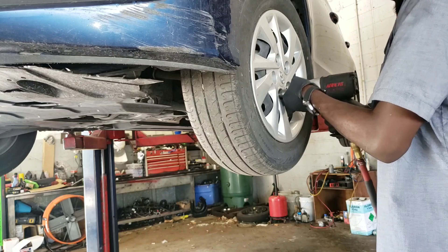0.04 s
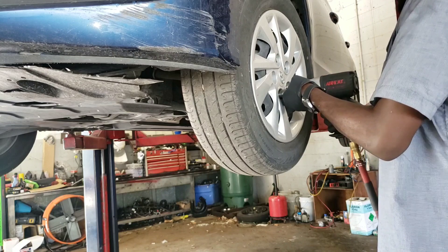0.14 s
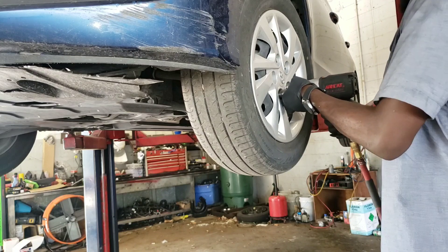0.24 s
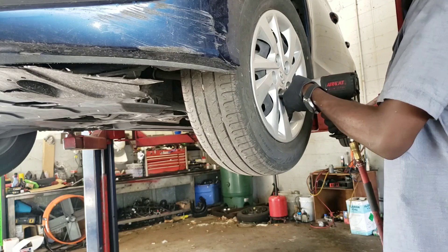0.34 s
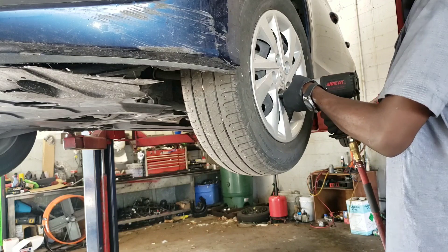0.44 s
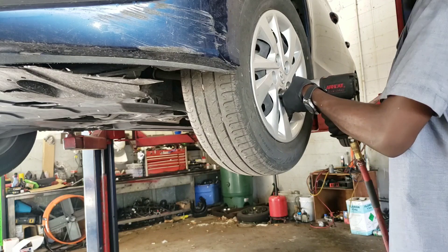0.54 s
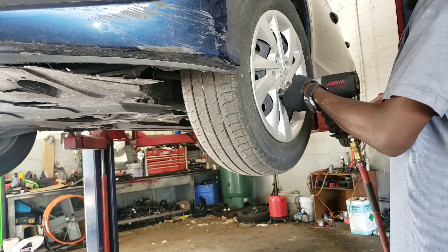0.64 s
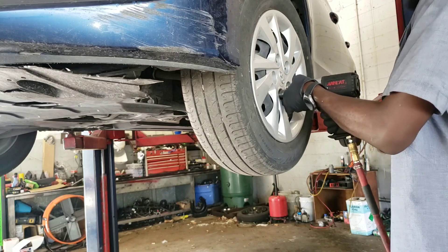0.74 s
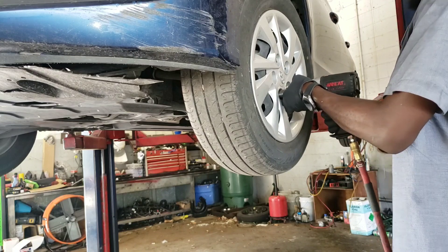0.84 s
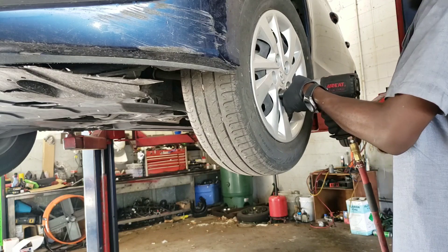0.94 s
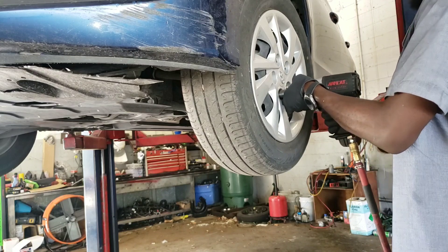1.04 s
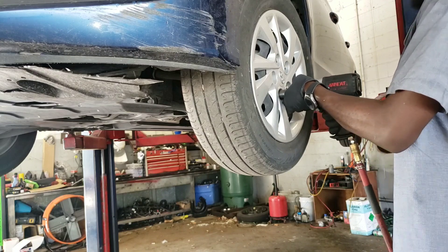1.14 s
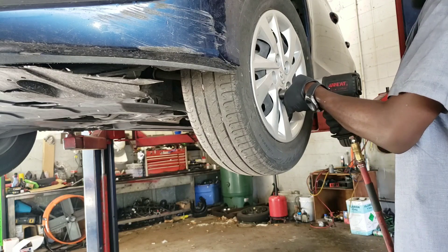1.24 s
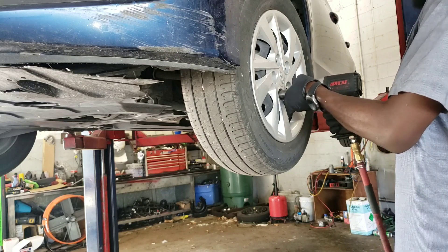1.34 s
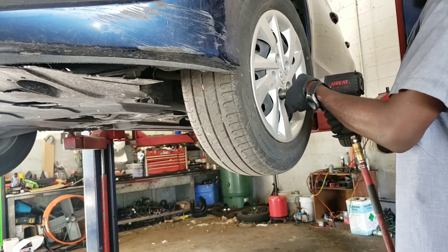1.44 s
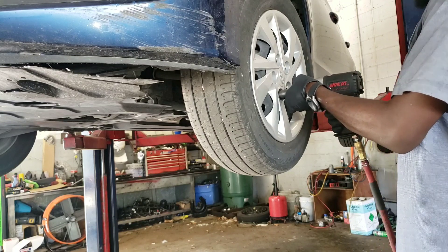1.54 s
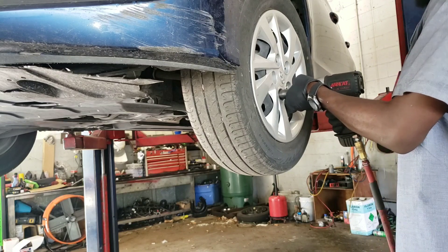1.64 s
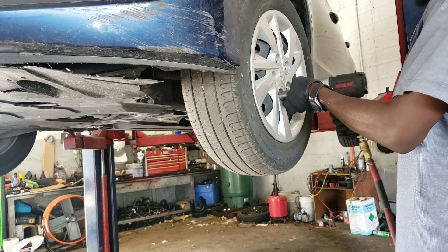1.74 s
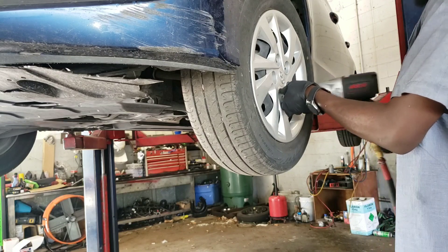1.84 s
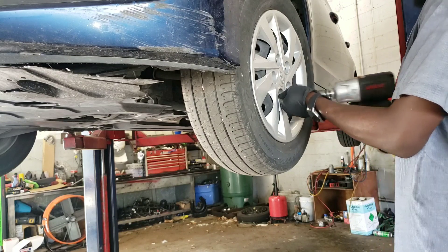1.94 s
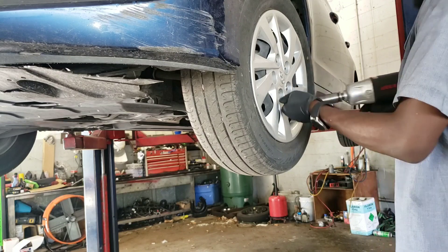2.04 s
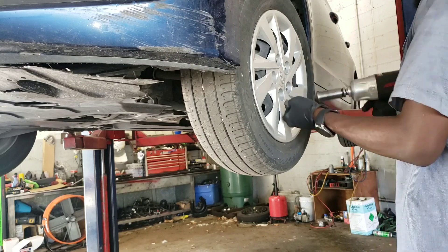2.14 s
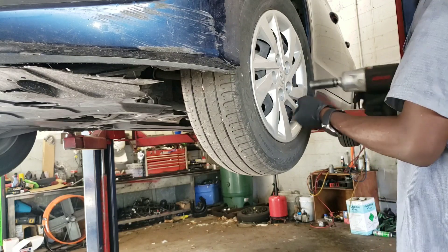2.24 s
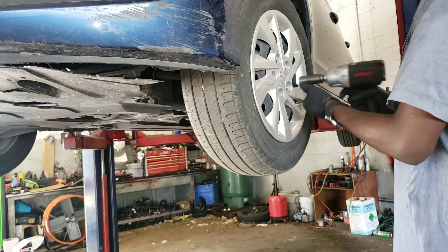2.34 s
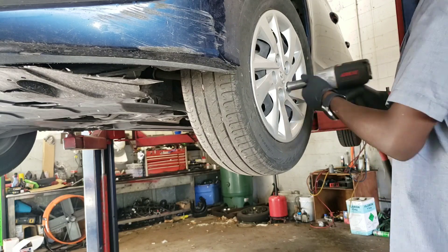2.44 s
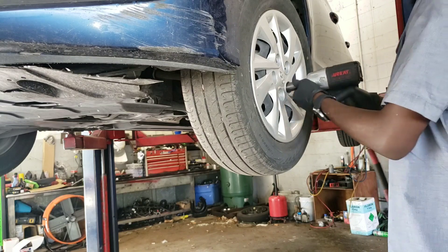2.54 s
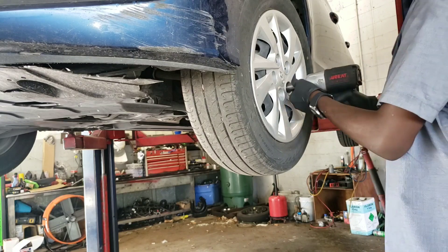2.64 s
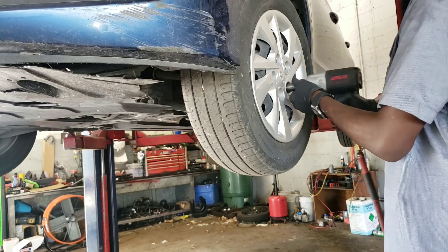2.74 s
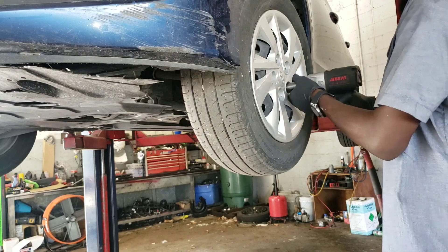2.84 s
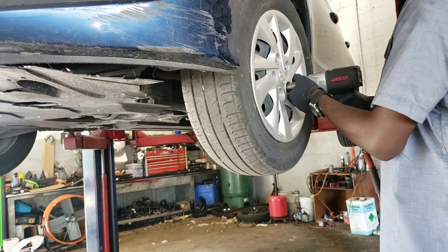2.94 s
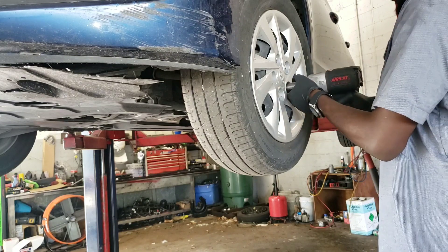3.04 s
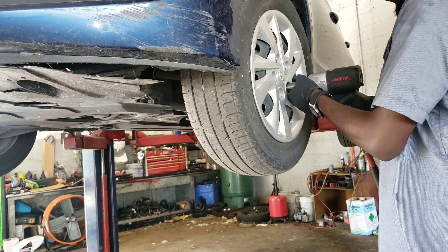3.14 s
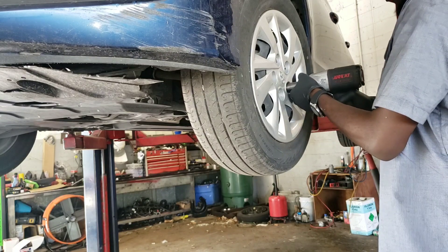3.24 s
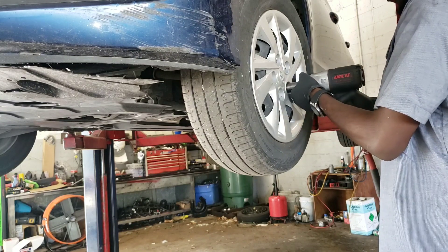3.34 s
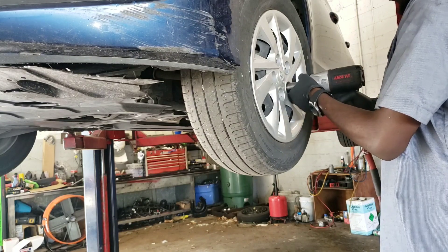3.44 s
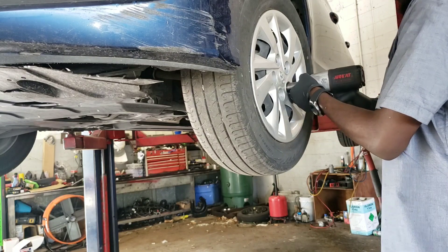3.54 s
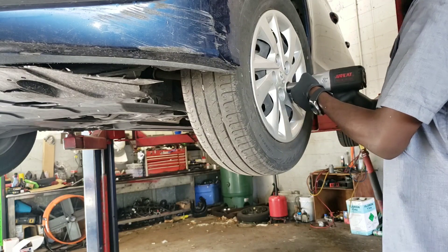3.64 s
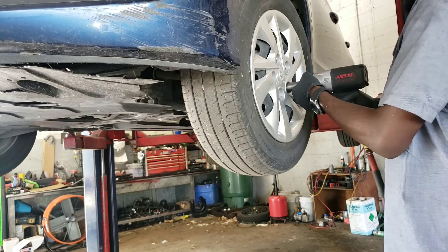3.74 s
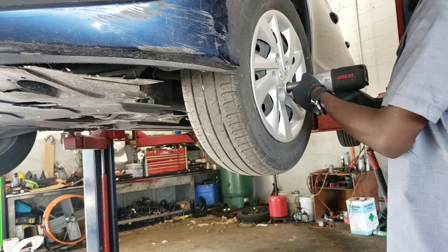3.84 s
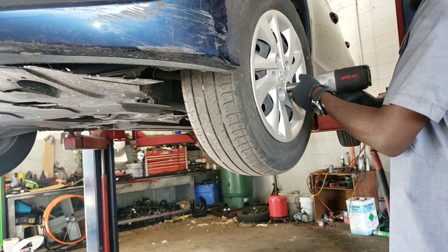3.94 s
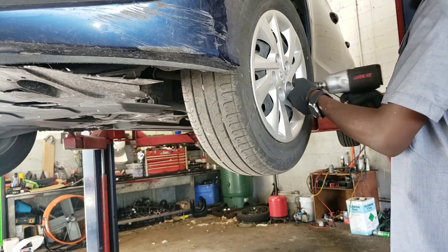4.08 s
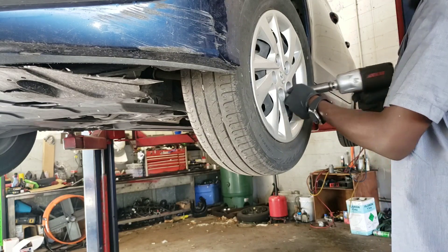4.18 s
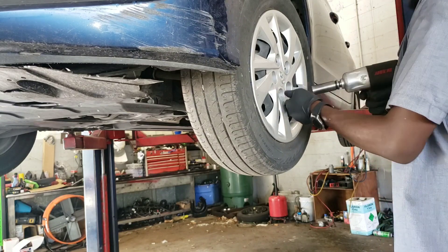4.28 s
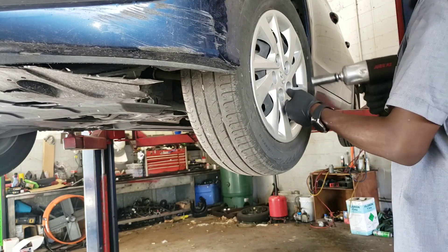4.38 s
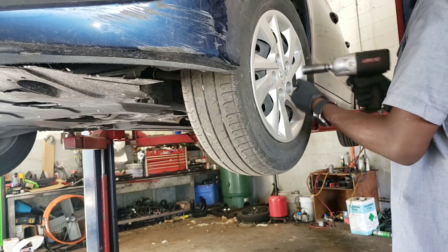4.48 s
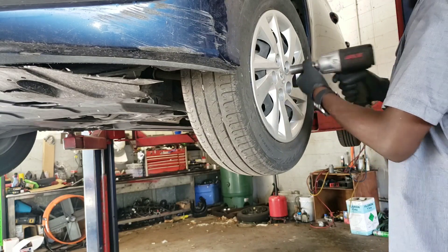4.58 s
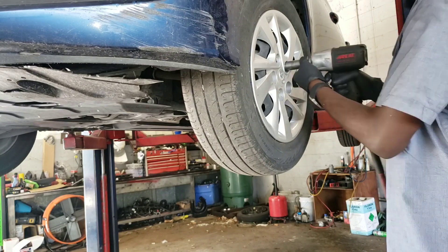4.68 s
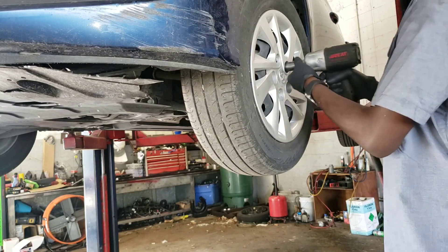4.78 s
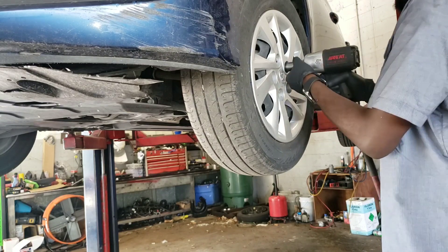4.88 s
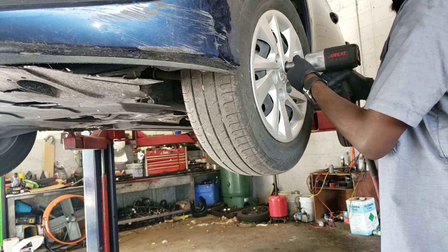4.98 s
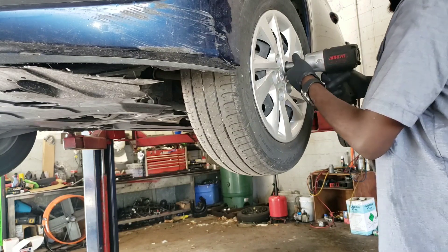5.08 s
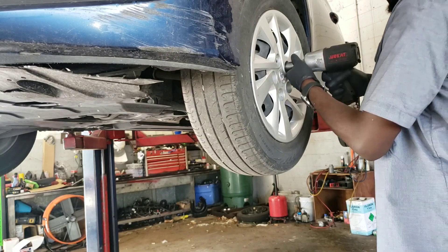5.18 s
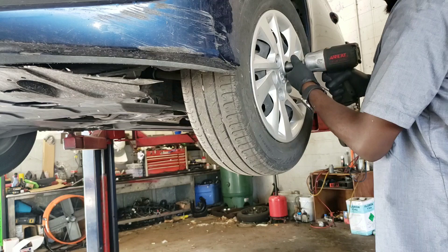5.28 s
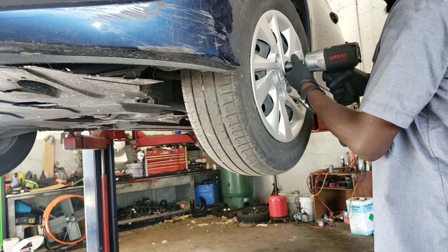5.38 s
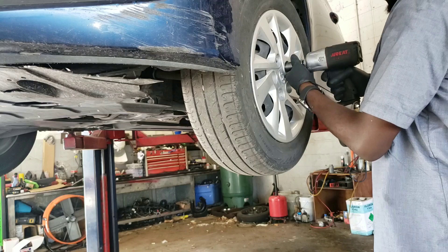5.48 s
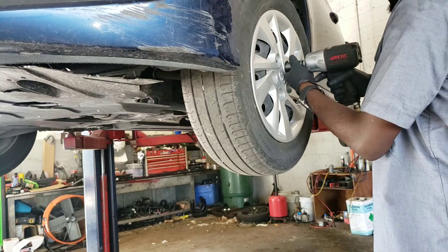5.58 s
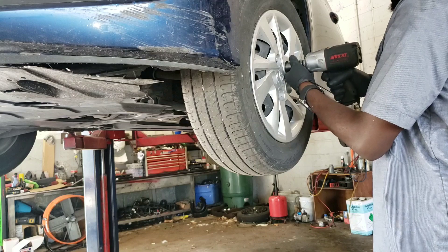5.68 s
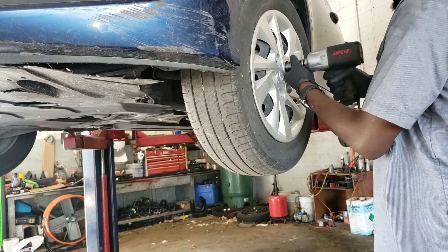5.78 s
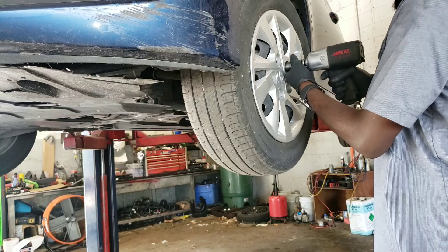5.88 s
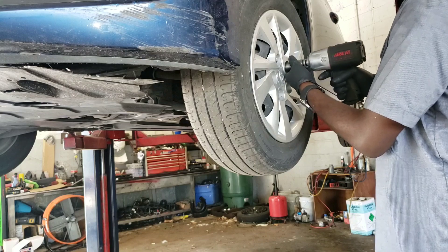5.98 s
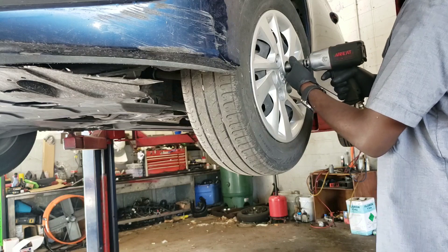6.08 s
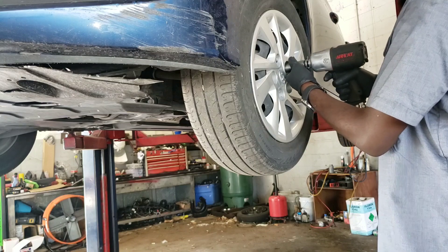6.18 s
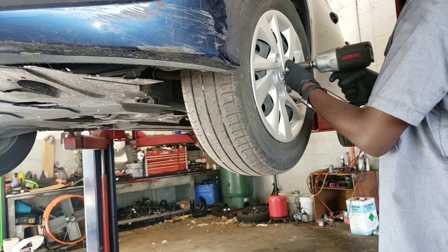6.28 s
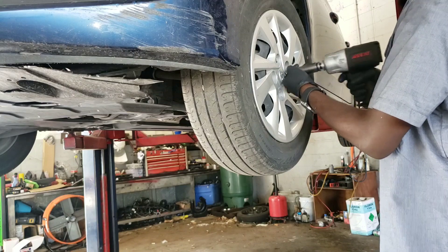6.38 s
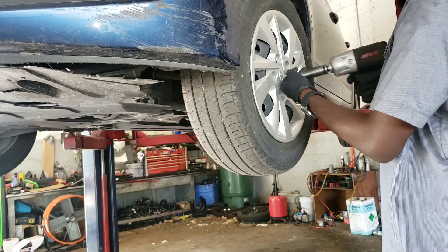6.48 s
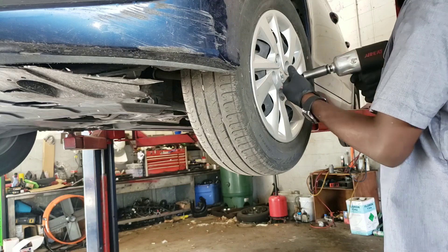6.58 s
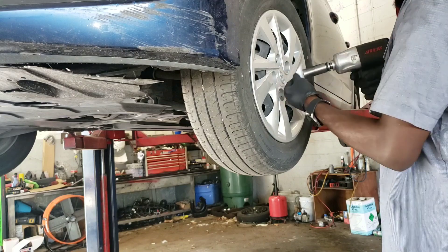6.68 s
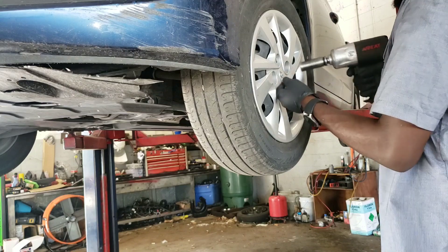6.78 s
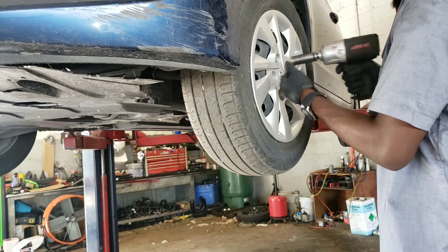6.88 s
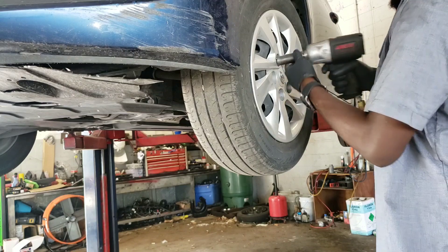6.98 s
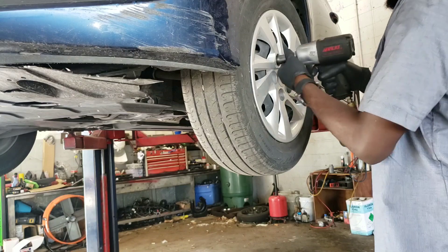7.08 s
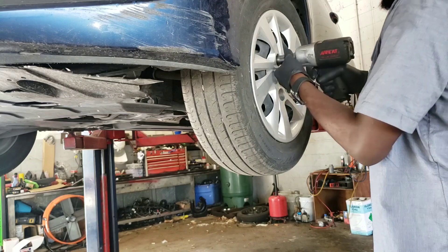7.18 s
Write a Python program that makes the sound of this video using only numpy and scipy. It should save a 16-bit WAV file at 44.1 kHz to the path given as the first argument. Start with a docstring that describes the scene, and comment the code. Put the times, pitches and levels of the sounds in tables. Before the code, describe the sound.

Close stereo pickup of a pneumatic wrench on a car's wheel nuts: rapid, uneven metal hammering, sharp treble snaps and rushing exhaust. Clustered pulls open the scene, then the freed motor sings up and winds down. Two more hammering groups come later, separated by hollow knocks, clicks and high socket jingles. A faint far whine lies behind; near the end another machine rises in the reverberant shop.

```python
"""An air impact wrench works on lug nuts in a repair shop: noise bursts and ringing metal make the hammer blows.
Exhaust air, shaped noise, hisses and rattles around them; a valve pop opens every pull but the first.
Then the vane motor, a stack of harmonics, runs free and winds down while the socket clinks and knocks.
A far machine whines, another starts up late, and the hall answers with fading noise echoes.
The right microphone port hears everything a little louder and earlier."""
import sys
import numpy as np
from scipy import signal
from scipy.fft import rfft, irfft, next_fast_len
from scipy.io import wavfile
from scipy.ndimage import map_coordinates

SR = 44100
rng = np.random.default_rng(int(sys.argv[2]) if len(sys.argv) > 2 else 0)


def store_pcm(level_fs):
    """Save levels as 16-bit WAV."""
    pcm = np.round(np.clip(level_fs, -1, 1) * 32767).astype(np.int16)
    wavfile.write(sys.argv[1], SR, np.atleast_2d(pcm).T)


def nominal_scale(level):
    """Amplitude ratio for a level in decibels (scalar or array-like)."""
    x = np.asarray(level, float) / 20
    return 10 ** x


N = 318402  # samples

# trigger pulls: (open [s], close [s], air level at open [dB], air level at close [dB], fade by 60 dB [s])
TRIGGER_PULLS = [(0, 0.05, -17.5, -33.5, 0.29), (0.135, 0.258, -24.5, -21.5, 0.29),
                 (0.394, 0.575, -22.5, -30.5, 0.44), (0.672, 0.913, -24.5, -25.5, 0.43),
                 (1.096, 1.242, -21.5, -28, 0.48), (1.436, 1.517, -24, -28.5, 1),
                 (2.829, 3.466, -20.5, -29, 0.39), (3.688, 3.814, -23.5, -30.5, 0.75),
                 (5.032, 5.598, -17.5, -28, 0.23), (5.83, 5.97, -22.5, -30, 0.54)]
# hammer blows that land hard: (time [s], relative clack level [dB], relative treble level [dB])
BLOWS = [(0.0032, -24.5, -24.5), (0.0392, -21.5, -28), (0.1692, -24, -12), (0.2024, -17.5, -11.5),
         (0.2187, -16.5, -15), (0.2506, -19, -16.0), (0.27, -13.5, -17), (0.4078, -24, -19),
         (0.4228, -12.5, -11), (0.4406, -18, -32), (0.4712, -17, -12.5), (0.5051, -17.5, -16),
         (0.5252, -14, -11), (0.6154, -21.5, -23), (0.6878, -14, -18), (0.7066, -20, -13),
         (0.74, -15.5, -14), (0.7567, -16.5, -12), (0.7921, -19.5, -11), (0.8416, -20.0, -11),
         (0.8668, -15.5, -10), (0.8869, -15, -22), (0.9172, -15, -9), (1.1243, -14, -13),
         (1.1667, -15, -6.5), (1.1977, -23, -12), (1.228, -18, -12), (1.453, -18, -14), (1.4724, -14, -8.5),
         (1.498, -15, -10), (1.5096, -21, -11.5), (1.5224, -23.0, -18), (1.5362, -18.5, -16),
         (2.8481, -16, -7.5), (2.8683, -17.5, -10), (2.905, -18, -11), (2.9431, -23, -13),
         (2.966, -15, -10), (2.9832, -12.5, -12.0), (3.024, -19, -20), (3.0654, -18.5, -14),
         (3.1054, -14.5, -12), (3.1298, -19, -12), (3.15, -16.5, -15), (3.1744, -19, -12),
         (3.192, -13, -11.5), (3.2292, -19.5, -10.5), (3.2614, -23, -12), (3.28, -16.5, -14),
         (3.296, -15, -11.5), (3.337, -16.5, -22.0), (3.3564, -18, -9), (3.389, -19, -10.0),
         (3.4024, -21, -13), (3.4163, -17.5, -11), (3.452, -37, -11), (3.4748, -21, -12), (3.507, -19, -13),
         (3.7074, -20.5, -16), (3.7271, -13.5, -9.5), (3.761, -28, -11), (3.782, -20.5, -11),
         (5.064, -19.5, -14.5), (5.081, -32, -19), (5.0997, -17, -19), (5.139, -17, -12), (5.177, -21, -16),
         (5.2165, -13, -12), (5.2386, -18, -25), (5.2576, -15, -11), (5.2788, -21.5, -14),
         (5.298, -24, -17), (5.3433, -17.5, -13), (5.39, -18.5, -12), (5.4124, -18.5, -5.5),
         (5.4295, -17.5, -12), (5.449, -15.5, -8.5), (5.4626, -23, -11), (5.4843, -15, -10),
         (5.4982, -21, -11.5), (5.5156, -16, -12), (5.532, -16, -9), (5.563, -23, -12),
         (5.5803, -18, -12.5), (5.6339, -20.5, -28), (5.8472, -19.5, -13.5), (5.8669, -20, -5.5),
         (5.897, -20, -6), (5.9224, -15, -10), (5.9352, -22, -8), (5.989, -19, -7.5)]
# ringing of the steel wheel: (frequency [Hz], relative level [dB], free fade by 60 dB [s])
WHEEL_MODES = [(130, -24.5, 0.66), (225, -11.5, 0.045), (364, -17.5, 0.095), (443, -9, 0.033),
               (598, -4.5, 0.054), (819, -12, 0.12), (1064, -7.5, 0.052), (1193, -3, 0.053),
               (1700, -8.5, 0.072), (1920, -11, 0.074), (2150, -29, 0.035)]
# ringing of the anvil that the hammer hits: (frequency [Hz], relative level [dB], free fade by 60 dB [s])
ANVIL_MODES = [(3028, 0.5, .05), (3564, 2, 0.07), (5500, 4, 0.041), (6250, 4.5, 0.034),
               (10500, -2.5, 0.018), (10800, -7.5, 0.028), (14000, 9, .03)]
# colour of the rushing air: (frequency [Hz], relative level per Hz [dB])
HISS_COLOUR = [(710, -33), (1200, -0.5), (1530, 2), (1880, 6.5), (2340, 2.5), (3620, 6), (4000, 2.5),
               (5740, 0.5), (8410, -6.5), (10800, 4), (14100, -1.5), (15700, 0), (16400, -33)]
# colour of a metal clack: (frequency [Hz], relative level per Hz [dB])
CLACK_COLOUR = [(1000, -31), (2000, 1), (3500, -1.5), (6000, 2.5), (7500, -4), (9000, -13.5)]
# colour of the sharp treble in a contact: (frequency [Hz], relative level per Hz [dB])
SPIT_COLOUR = [(7500, -17), (9000, 0.5), (10500, 6), (13000, 3.5), (15300, 3.5), (16500, -3.5)]
# colour of a dull, hollow knock: (frequency [Hz], relative level per Hz [dB])
KNOCK_COLOUR = [(90, -5), (200, 0.5), (450, 9.5), (1000, 6), (2000, 6.5), (3500, -39)]
# how alike the two ports hear noise: (frequency [Hz], left-right likeness [-1 to 1])
PORT_LIKENESS = [(40, 0.77), (80, 1), (150, 0.9), (400, 0.87), (800, 0.11), (1500, 0.045), (4000, 0.086),
                 (15000, 0.047)]


def unit(x):
    """Scaled to an rms of 1."""
    return x / np.sqrt(np.mean(x ** 2) + 1e-20)


def along(points, hz):
    """Reads (Hz, value) points at any frequency, on a log axis."""
    point_hz, value = np.transpose(points)
    return np.interp(np.log(hz + 1), np.log(point_hz + 1), value)


def curves(rows):
    """One value per sample for each column after the time."""
    s, *columns = np.transpose(rows)
    return [np.interp(np.arange(N) / SR, s, column) for column in columns]


def wobble(rate):
    """A smooth random curve with rate knots a second."""
    knots = rng.standard_normal(int(N * rate / SR) + 4)
    return map_coordinates(knots, [np.arange(N) * rate / SR])


def filtered(x, response):
    """Sound x shaped by a (complex) response to each frequency."""
    m = next_fast_len(N + 8192)
    return irfft(rfft(x, m) * response(np.fft.rfftfreq(m, 1 / SR)), m)[..., :N]


def rush(colour):
    """Steady stereo noise of rms 1, partly alike in both ports."""
    def response(hz):
        turn = np.arccos(np.clip(along(PORT_LIKENESS, hz), -1, 1)) / 2
        return nominal_scale(along(colour, hz)) * [np.cos(turn), np.sin(turn)]
    mid, side = filtered(rng.standard_normal((2, N)), response)
    return unit(np.array([mid + side, mid - side]))


def train(times, db):
    """One impulse per contact."""
    return np.bincount(np.round(times * SR).astype(int), nominal_scale(db), N)[:N]


def dying(x, t60, rise):
    """Each impulse becomes a quick swell (rise, s) and an exponential fade (60 dB in t60 s)."""
    soft = np.exp(-1 / (rise * SR))
    fade = nominal_scale(-60 / (t60 * SR))
    return signal.lfilter([1 - soft], np.convolve([1, -fade], [1, -soft]), x)


def ringing(modes, times, db, near_hz=None, swing_db=2):
    """Every contact rings the modes at new strengths, a little differently at each port."""
    scatter_db = rng.standard_normal((len(db), len(modes), 3)) * [swing_db, 1.5, 1.5]
    out = np.zeros((2, N))
    for k, (hz, level_db, t60) in enumerate(modes):
        r, w = nominal_scale(-60 / (t60 * SR)), 2 * np.pi * hz / SR
        if near_hz is not None:  # modes ring less the more octaves they lie from this pitch
            level_db = -14 * abs(np.log2(hz / near_hz))
        both_db = db + level_db + scatter_db[:, k, 0]
        hits = [train(times, both_db + scatter_db[:, k, side]) for side in (1, 2)]
        out += signal.lfilter([np.sin(w)], [1, -2 * r * np.cos(w), r * r], hits)
    return out


def stack(hz, orders, jitter, waver_db, tilt_db=0):
    """Sines at multiples of a slightly unsteady rate; tilt_db is added once per multiple."""
    phase = 2 * np.pi * np.cumsum(hz * (1 + jitter * wobble(60))) / SR
    out = 0
    for k, db in orders:
        level = nominal_scale(db + k * tilt_db + waver_db * wobble(30))
        out = out + level * np.sin(k * phase + rng.uniform(0, 2 * np.pi))
    return out


def hall_noise():
    """The steady murmur of the hall: coloured noise with a slight drift in level."""
    # (frequency [Hz], relative level per Hz [dB])
    colour = [(15, -51), (28, -46.5), (54, -3.5), (97, -14), (128, -12), (377, -24), (444, -29),
              (685, -30.5), (806, -34), (924, -30.5), (1920, -32.5), (2080, -33.5), (6340, -35.5),
              (7270, -42.5), (15100, -35), (16400, -55.5)]
    return nominal_scale(-52 + 0.8 * wobble(5)) * rush(colour)


def far_whine():
    """A far machine whines: a few multiples of a slowly moving pitch."""
    # path of the whine: (time [s], pitch [Hz], level [dB])
    path = [(0, 385, -77.5), (2.26, 387, -62), (2.6, 349, -70), (3.5, 390, -75), (4.1, 392, -59),
            (5.0, 393, -59), (6.9, 392.7, -73), (7.05, 369, -64), (7.22, 365, -64)]
    # its multiples: (multiple of the pitch, relative level [dB])
    multiples = [(1, -7.5), (2, -5.5), (3, -17.5)]
    hz, db = curves(path)
    return nominal_scale(db) * stack(hz, multiples, jitter=0.00055, waver_db=3)


def late_machine():
    """A machine starts late: noise and a low hum come up; a straining tone and a rasp swell, then weaken."""
    # colour of its noise: (frequency [Hz], relative level per Hz [dB])
    colour = [(53, -41), (90, -23), (128, 4), (225, -7), (404, -7.5), (1050, -20), (12900, -22.5),
              (15400, -28), (16400, -55.5)]
    # its loudness: (time [s], level [dB])
    loudness = [(5.85, -85), (6.0, -53.5), (6.2, -47.5), (6.45, -49), (6.7, -50.5), (7.22, -46.5)]
    # its strain: (time [s], tone [Hz], tone over its noise [dB], rasp over its noise [dB])
    strain = [(6.0, 385, -25, -7), (6.12, 392, 2.5, -11), (6.3, 398, 4, -2), (6.45, 404, 6, -3.5),
              (6.55, 404.4, 2, -17), (6.7, 402, -5, -17), (7.22, 390.5, -8, -11)]
    tone_hz, tone_db, rasp_db = curves(strain)
    partials = [(0.885, -3), (1, 0), (2, -14)]  # (multiple, dB)
    sides = [stack(tone_hz, partials, jitter=0.012, waver_db=3) for side in range(2)]
    tone = nominal_scale(tone_db) * np.array(sides)
    rasp_colour = [(500, -38), (900, -3), (1700, -1.5), (2800, -17)]  # (Hz, dB per Hz)
    rasp = nominal_scale(rasp_db + 3 * wobble(25)) * rush(rasp_colour)
    hum = stack(np.full(N, 119.56), [(1, -11)], jitter=0.0037, waver_db=3.5)
    return nominal_scale(curves(loudness)[0]) * (rush(colour) + tone + rasp + hum)


def shop():
    """The background: hall noise, the far whine and the late machine."""
    return hall_noise() + far_whine() + late_machine()


def hall(x):
    """Echoes as fading noise, each pitch at its own speed, with a new random pattern every quarter second."""
    # (frequency [Hz], fade by 60 dB [s])
    fade = [(150, 0.64), (700, 0.42), (5000, 0.4), (13000, 0.32)]
    out, step = np.zeros((2, N + SR)), SR // 4
    for start in range(0, N, step):
        hz, t, z = signal.stft(rng.standard_normal((2, SR // 2)), SR, nperseg=256)
        alike = np.clip(along(PORT_LIKENESS, hz), 0, 1)[:, None]  # long waves reach both ports alike
        z[1] = alike * z[0] + np.sqrt(1 - alike ** 2) * z[1]
        tail = signal.istft(z * nominal_scale(-60 * t / along(fade, hz)[:, None]), SR, nperseg=256)[1]
        wet = signal.fftconvolve(x[:, start:start + step], tail / np.linalg.norm(tail[0]), axes=1)
        out[:, start:start + wet.shape[1]] += wet
    return out[:, :N]


def handling():
    """The socket is set against nuts and wheel: short clacks, hollow knocks, scrapes and damped ringing."""
    # contacts: (time [s], relative clack, treble and knock levels [dB], pitch that rings most [Hz])
    contacts = [(2.319, -47, -62, -53, 3000), (2.5375, -37.5, -43, -46, 2630), (2.548, -46, -58, -63, 1700),
                (2.616, -43, -49, -50, 3000), (2.6279, -30, -27, -35.5, 3060),
                (2.644, -37, -44, -37.5, 3030), (2.663, -38, -31, -28.5, 130), (2.729, -35, -34, -38, 3630),
                (2.822, -42, -49, -46, 3000), (4.1175, -40.5, -41, -33, 600), (4.284, -49, -65, -58, 1190),
                (4.7413, -42, -55, -28.5, 1100), (4.7465, -33, -34, -21, 1700),
                (4.7778, -52, -54, -28, 1100), (4.815, -43, -56, -51, 1700), (4.842, -31, -32, -36, 5570),
                (4.849, -29, -47, -32, 5570), (4.903, -29.5, -31.5, -63, 3600),
                (4.9141, -34, -34, -33, 1140), (6.666, -49, -37, -57, 2980), (6.7697, -46, -39, -45, 2986),
                (6.947, -48, -43, -62, 2965), (7.145, -26, -26, -44, 3060), (7.1764, -29, -30, -25.5, 351)]
    # scrapes over a nut: (start [s], loudest [s], end [s], level [dB]); an end before the start is silent
    scrapes = [(2.628, 2.67, 2.7, -50), (4.838, 4.85, 4.65, -41.5), (7.117, 7.131, 7.165, -34)]
    s, clack_db, treble_db, knock_db, near_hz = np.transpose(contacts)
    t = np.arange(N) / SR
    clack = dying(train(s, clack_db - 2), t60=0.049, rise=0.00037)
    scrape = sum(nominal_scale(db) * np.interp(t, [a, top, b], [0, 1, 0]) for a, top, b, db in scrapes)
    scrape = scrape * nominal_scale(3 * wobble(370))
    spit = dying(train(s, treble_db - 3), t60=0.033, rise=0.0006) * rush(SPIT_COLOUR)
    knock = dying(train(s, knock_db - 1), t60=0.022, rise=0.00065) * rush(KNOCK_COLOUR)
    # a hand on the socket shortens the ringing
    held = [(hz, db, 0.7 * t60) for hz, db, t60 in WHEEL_MODES + ANVIL_MODES]
    ring = ringing(held, s, clack_db - 4.5, near_hz)
    wheel = ringing(WHEEL_MODES, s, knock_db - 14)
    return (clack + scrape) * rush(CLACK_COLOUR) + spit + knock + wheel + ring


def clinks():
    """The loose socket rings very high when it clinks, and rattles damped on its shaft in between."""
    # clear clinks: (time [s], relative tick level [dB], relative ring level [dB])
    clear = [(1.614, -32, -20), (1.6673, -27, -31), (1.7522, -18, -36), (1.8209, -27, -29),
             (1.8725, -41, -26), (1.904, -41, -31), (1.985, -24, -25), (2.627, -30, -31), (3.87, -12, -26),
             (3.926, -15.5, -26.5), (4.006, -34, -25.5), (4.049, -21, -31), (4.089, -19, -21),
             (4.121, -28, -28), (4.2598, -28.5, -29.5), (6.059, -17, -32), (6.1457, -22, -26),
             (6.289, -27, -33), (6.338, -27, -25), (6.5833, -26.5, -39), (6.604, -38, -39),
             (7.118, -16.5, -31)]
    # faint jingling while the shaft coasts: (start [s], end [s], ticks per second, relative level [dB])
    jingle = [(1.596, 1.954, 70, -42), (1.964, 2.341, 20, -48.5), (3.858, 4.24, 45, -43),
              (6.043, 6.502, 60, -37.5)]
    # ringing of the socket: (frequency [Hz], relative level [dB], fade by 60 dB [s])
    socket = [(9560, -24.5, 0.11), (12700, -30, .02), (12560, -20, .03), (12950, 0, 0.099),
              (12900, -12.5, .3), (13150, -13, .02)]
    s, tick_db, ring_db = np.transpose(clear)
    faint = []
    for a, b, rate, db in jingle:
        for k in range(round(rate * (b - a))):
            faint.append((rng.uniform(a, b), db + rng.normal(0, 4)))
    faint_s, faint_db = np.transpose(faint)
    ticks = train(np.r_[s, faint_s], np.r_[tick_db - 16, faint_db - 14])
    tick = dying(ticks, t60=0.021, rise=0.0012) * (rush(SPIT_COLOUR) + nominal_scale(2) * rush(CLACK_COLOUR))
    rattling = nominal_scale(5 * wobble(220))  # it keeps touching the shaft while it rings
    damped = [(hz, 0, 0.02) for hz, db, t60 in socket[1:]]
    return tick + rattling * ringing(socket, s, ring_db - 5.5) + ringing(damped, faint_s, faint_db - 9)


def valve():
    """A dull pop and click just after the trigger opens, for every pull but the first."""
    on, on_db = np.transpose(TRIGGER_PULLS)[[0, 2], 1:]
    pop = dying(train(on + 0.0073, on_db - 5.5), t60=0.024, rise=0.0021)
    return pop * (rush(KNOCK_COLOUR) + nominal_scale(1) * rush(CLACK_COLOUR) + nominal_scale(5.5) * rush(SPIT_COLOUR))


def spin(start, start_hz, cut, top_hz, db):
    """Vane rate and level of one free run: speeding up under air, then coasting against drag."""
    drag, knee_s = 0.0168, 0.021  # period growth [s per s] once the air is cut, its soft onset [s]
    cut_s, stall_hz = 0.02, 130  # time the valve takes to shut [s], slowest loud rate [Hz]
    t = np.arange(N) / SR
    late = np.maximum(t - cut, 0)
    driven_hz = np.interp(t, [start, cut], [start_hz, top_hz])
    coast_hz = 1 / (1 / top_hz + drag * (np.hypot(late, knee_s) - knee_s))
    hz = np.where(t < cut, driven_hz, coast_hz)
    driven_db = -35 - 7.5 * np.clip(1 + (t - cut) / cut_s, 0, 1)  # the tone dips as the valve shuts
    coast_db = -32 + 9 * np.log2(hz / 450)  # fading with speed
    shut = np.clip(late / cut_s, 0, 1)
    heard = np.clip((t - start) / 0.04 + 1, 0, 1) * np.clip(hz / stall_hz * 8 - 7, 0, 1)
    return hz, heard * nominal_scale(db + (1 - shut) * driven_db + shut * coast_db)


def motor():
    """Freed of load the vanes sing up, then drag slows them when the air is cut; each also wheezes."""
    # free runs: (nut lets go [s], vane rate [Hz], air cut [s], top rate [Hz], relative level [dB])
    free_runs = [(1.465, 295, 1.573, 500, 1), (3.74, 325, 3.829, 462, -2), (5.9, 320, 5.948, 356, -3)]
    # vane tone: (multiple of the vane rate, relative level [dB])
    multiples = [(1, 5), (2, -5), (3, -4), (4, -7), (5, -7), (6, -6), (7, -6), (8, -9), (9, -11),
                 (10, -13),]
    # how the housing passes the tone on: (frequency [Hz], gain [dB])
    housing = [(100, -0.5), (400, -2.5), (600, -8.5), (800, 3.5), (1050, 10.5), (1220, 6), (1400, 9.5),
               (1600, 4.5), (1850, 6), (2400, -9), (5000, -47.5)]
    tone, wheeze, t = np.zeros(N), np.zeros(N), np.arange(N) / SR
    for row in free_runs:
        hz, level = spin(*row)
        driven = np.clip((row[2] - t) / 0.02 + 1, 0, 1)
        # slower vanes sound duller; under air each higher multiple is dimmer
        tilt_db = 1.2 * np.log2(hz / 450) - 4 * driven
        tone += level * stack(hz, multiples, jitter=0.006, waver_db=2.2, tilt_db=tilt_db)
        wheeze += level * (1 + 0.46 * np.cos(2 * np.pi * np.cumsum(hz) / SR))
    low_air = rush([(300, -36), (800, 1), (1500, 4), (2200, -6), (4000, -40)])  # (Hz, dB per Hz)
    air = nominal_scale(-11.5) * rush(HISS_COLOUR) + nominal_scale(-6) * low_air
    return nominal_scale(-1) * filtered(tone, lambda hz: nominal_scale(along(housing, hz))) + wheeze * air


def clang():
    """The shaken wheel and anvil hum at their modes, each coming and going."""
    out = np.zeros(N)
    for hz, db, t60 in WHEEL_MODES + [(hz, db - 7, t60 / 2) for hz, db, t60 in ANVIL_MODES]:
        r, w = nominal_scale(-60 / (t60 * SR)), 2 * np.pi * hz / SR
        hum = signal.lfilter([1], [1, -2 * r * np.cos(w), r * r], rng.standard_normal(N))
        out += nominal_scale(db + 6 * wobble(14)) * unit(hum)
    return unit(out)


def exhaust():
    """Air rushes out in lumps while the trigger is held, then bleeds away; loose parts chatter in it."""
    # colour of the rattling parts: (frequency [Hz], relative level per Hz [dB])
    rattle_colour = [(53, -23), (130, 0), (300, 2), (441, -1.5), (876, -0.5), (1170, 6), (1600, -0.5),
                     (2080, -36), (3520, -120)]
    chatter = unit(nominal_scale(1.2 * wobble(350) + 4 * wobble(50)))
    rattle = unit(nominal_scale(5.4 * wobble(60))) * rush(rattle_colour)
    noise = nominal_scale(1) * chatter * rush(HISS_COLOUR) + nominal_scale(-11.5) * rattle
    t, flow, shaken = np.arange(N) / SR, np.zeros(N), np.zeros(N)
    for on, off, on_db, off_db, t60 in TRIGGER_PULLS:
        after = np.maximum(t - off, 0)
        opening = np.clip((t - on) / 0.075 + 0.24 * (t >= on), 0, 1)
        flow += opening * nominal_scale(np.interp(t, [on, off], [on_db, off_db]) - 60 * after / t60)
        # the shaking stops sooner than the air: it has this fade on top
        shaken = np.maximum(shaken, (t >= on) * nominal_scale(-60 * after / 0.3))
    noise += nominal_scale(-8) * shaken * chatter * clang()  # metal shaken by the motor
    s = np.array(BLOWS)[:, 0]
    # the hiss is briefly quieter just before each hard blow: fades made backwards in time
    lull = dying(train(s, np.zeros(len(s)))[::-1], t60=0.016, rise=0.0008)[::-1]
    return flow * nominal_scale(-13 * np.clip(lull, 0, 1)) * noise


def boom():
    """Blows on a seized nut shake the whole wheel, less and less until the nut gives."""
    # nuts: (first blow [s], relative boom level while seized [dB])
    nuts = [(0, -9), (2.84, -11), (5.04, -13)]
    # boom of the wheel: (frequency [Hz], relative level [dB], fade by 60 dB [s])
    boom_modes = [(444, 0.97, 0.07)]
    s, db = np.transpose(BLOWS)[:2]
    first, boom_db = np.transpose(nuts)
    nut = np.clip(np.searchsorted(first, s) - 1, 0, None)
    loosening_db = -60 * (s - first[nut]) / 0.95
    return ringing(boom_modes, s, db + boom_db[nut] + loosening_db)[[0, 0]]  # same in both ports


def hammer():
    """Each blow clacks in the anvil, spits treble, thumps the wheel and rings it; jolts swell more softly."""
    # softer jolts as the hammer rides over the anvil: (time [s], relative clack [dB], relative treble [dB])
    jolts = [(0.1508, -15, -7.5), (0.4515, -25, -27), (0.4888, -27, -28), (0.7733, -15.5, -7.5),
             (0.8204, -20.0, -10.5), (0.8505, -28, -16), (0.8887, -19.0, -8), (1.1473, -17, -10),
             (1.1792, -16.5, -14), (1.212, -12.5, -8.5), (2.852, -16.5, -20), (2.885, -13.5, -8),
             (2.913, -14, -12), (3.0043, -17.5, -10), (3.0416, -18, -12), (3.213, -17.5, -12),
             (3.2439, -12.5, -19), (3.372, -14, -8), (3.435, -18, -20.0), (3.7472, -19.0, -15),
             (5.044, -17.5, -25), (5.1198, -12, -21), (5.163, -17, -8), (5.198, -29, -12),
             (5.3228, -20, -11), (5.3702, -19, -15), (5.6075, -20, -6.5), (5.883, -16.5, -15),
             (5.954, -27, -15), (5.9708, -22, -13.5)]
    jolt_rise = 0.0022  # s
    s, clack_db, treble_db = np.transpose(BLOWS)
    soft_s, soft_db, soft_treble_db = np.transpose(jolts)
    clack = dying(train(s, clack_db - 3), t60=0.034, rise=0.00011)
    clack += dying(train(soft_s, soft_db - 2), t60=0.066, rise=jolt_rise)
    snap = dying(train(s, treble_db - 5.5), t60=0.0083, rise=0.00017)
    spit = snap + dying(train(s, treble_db - 7.5), t60=0.054, rise=0.00032)
    spit += dying(train(soft_s, soft_treble_db - 5), t60=0.047, rise=jolt_rise)
    s, db = np.r_[s, soft_s], np.r_[clack_db, soft_db]
    thump = dying(train(s, db - 10), t60=0.052, rise=0.0027) * rush(KNOCK_COLOUR)
    rung = ringing(WHEEL_MODES, s, db - 16, swing_db=5) + ringing(ANVIL_MODES, s, db - 17, swing_db=5)
    return (clack + nominal_scale(-13) * snap) * rush(CLACK_COLOUR) + spit * rush(SPIT_COLOUR) + thump + rung


def scene():
    """All sources and their echoes; sound reaches the left port softer and a little later."""
    # (frequency [Hz], left over right [dB])
    lean = [(60, -3), (240, -1.5), (950, -2.5), (3770, -3), (15000, -5)]
    struck = hammer() + boom()
    touched = handling() + clinks() + valve()
    whine = motor()
    echoes = hall(nominal_scale(-4.5) * struck + nominal_scale(-5) * touched + nominal_scale(-5.5) * whine)
    wrench = struck + touched + whine + exhaust() + echoes

    def ports(hz):
        lag = 4 / SR  # s
        left = nominal_scale(along(lean, hz) / 2) * np.exp(-2j * np.pi * hz * lag)
        return [left, nominal_scale(-along(lean, hz) / 2)]
    return filtered(wrench + shop(), ports)


def top_cut(x):
    """Nothing passes above the cut-off."""
    return signal.sosfilt(signal.butter(12, 16640, fs=SR, output="sos"), x)


def record(dry):
    """A steep limit at the top of the treble, then a hard ceiling on the level."""
    # (frequency [Hz], gain [dB])
    treble_limit = [(15300, -1.5), (15900, -46), (16600, -47.5), (16800, -76.5)]
    kept = filtered(dry, lambda hz: nominal_scale(along(treble_limit, hz)))
    return top_cut(np.clip(kept, -1, 1))


dry = scene()
out = record(dry)
store_pcm(out)
```